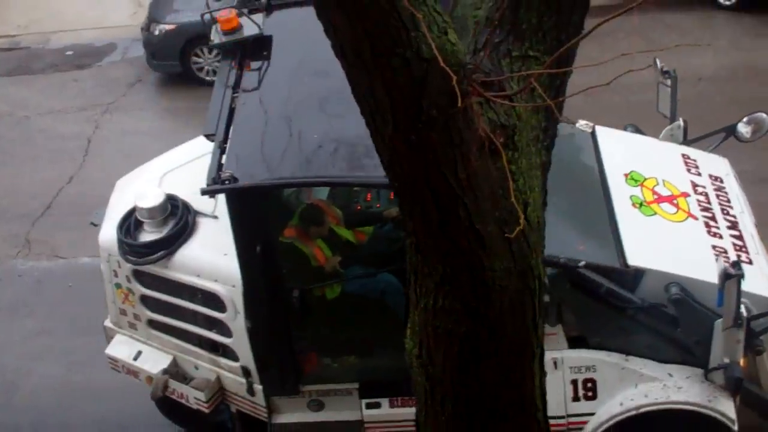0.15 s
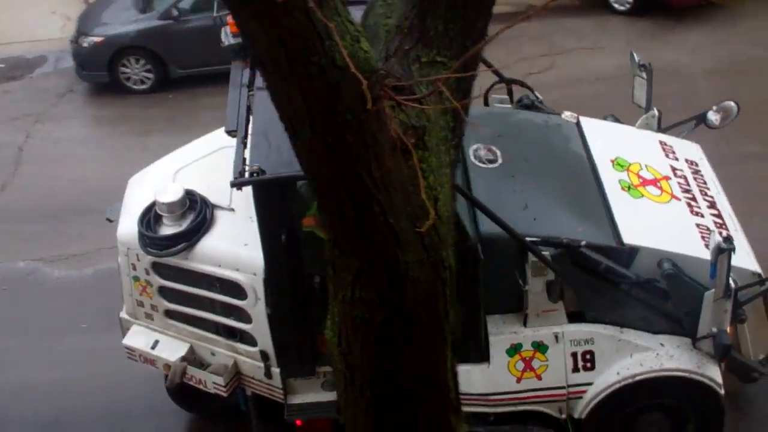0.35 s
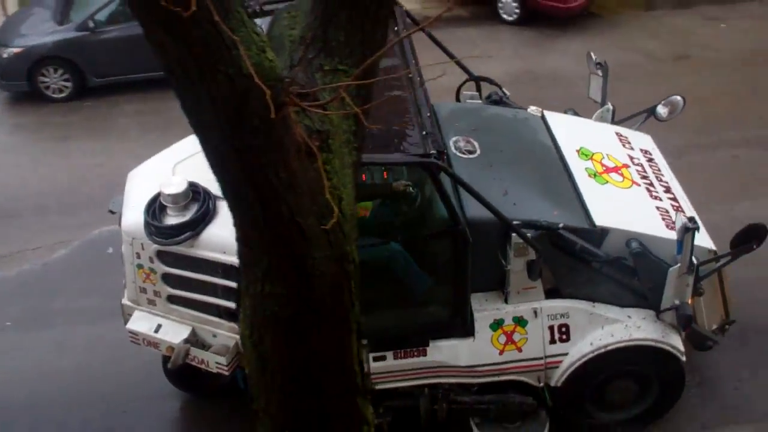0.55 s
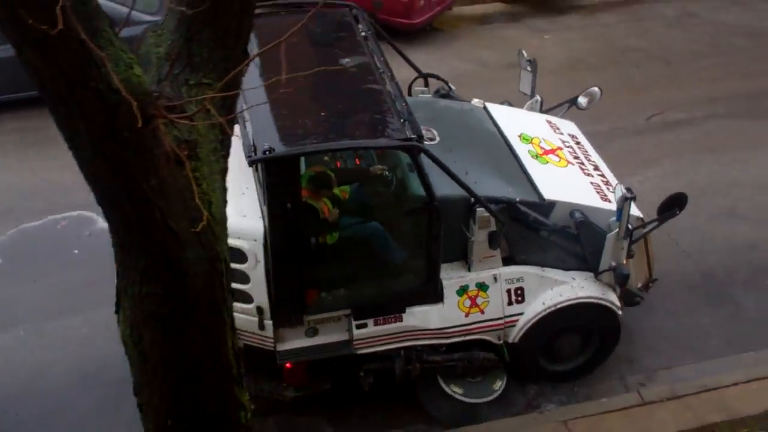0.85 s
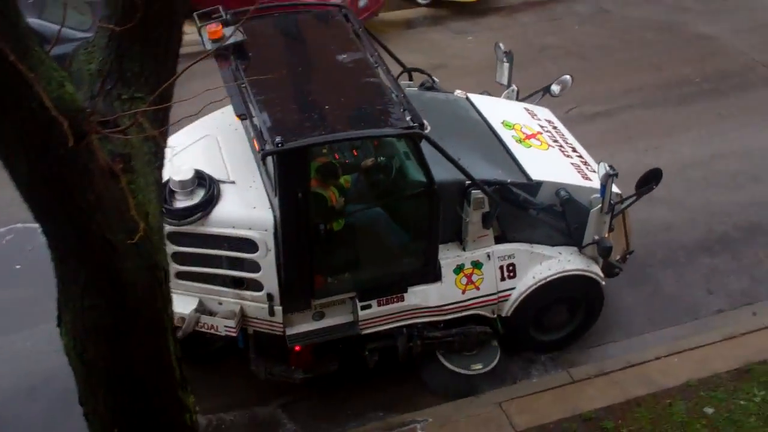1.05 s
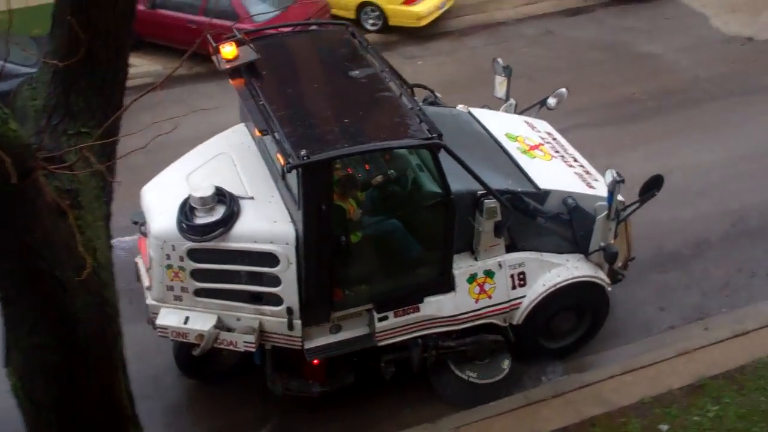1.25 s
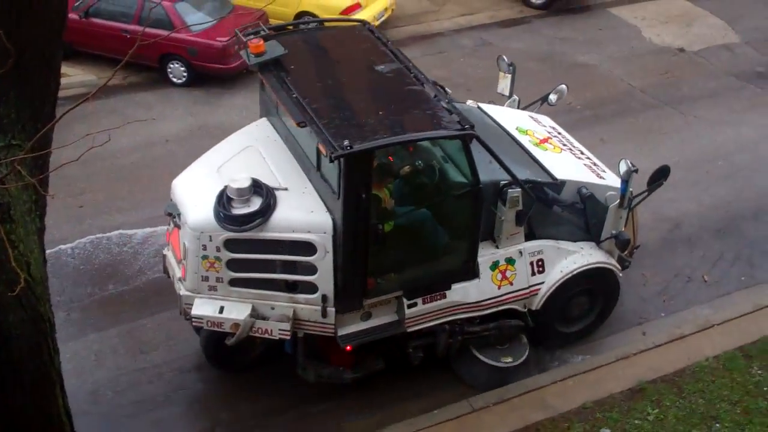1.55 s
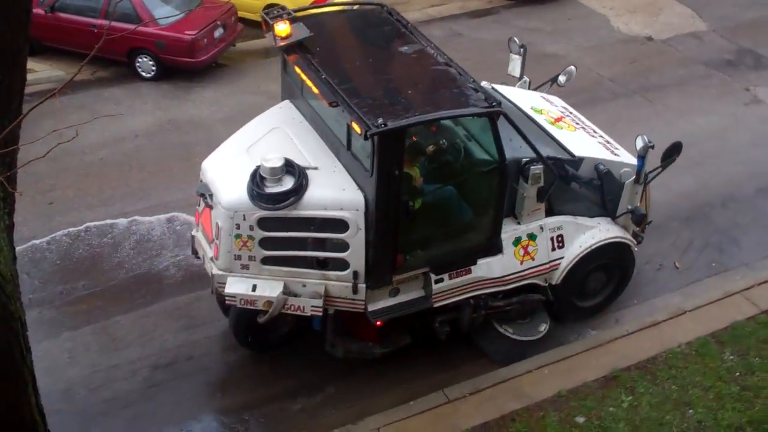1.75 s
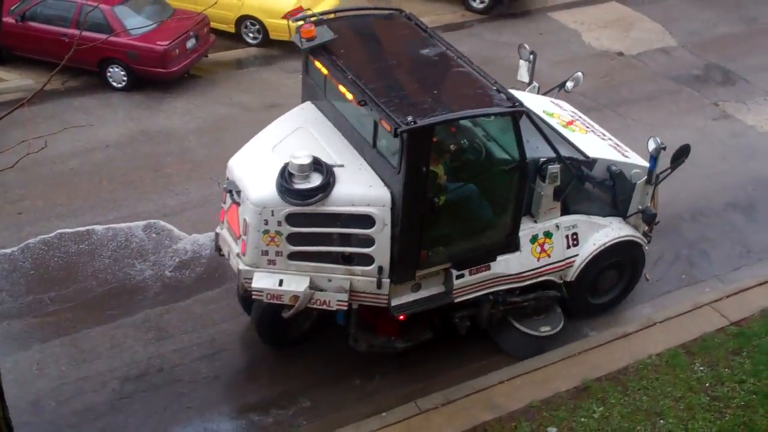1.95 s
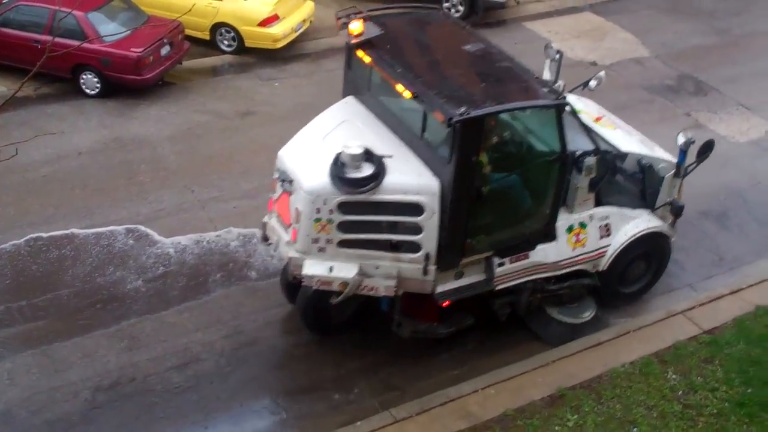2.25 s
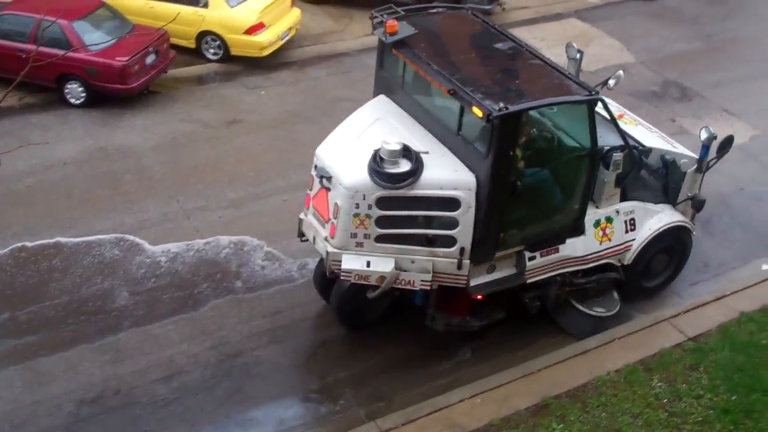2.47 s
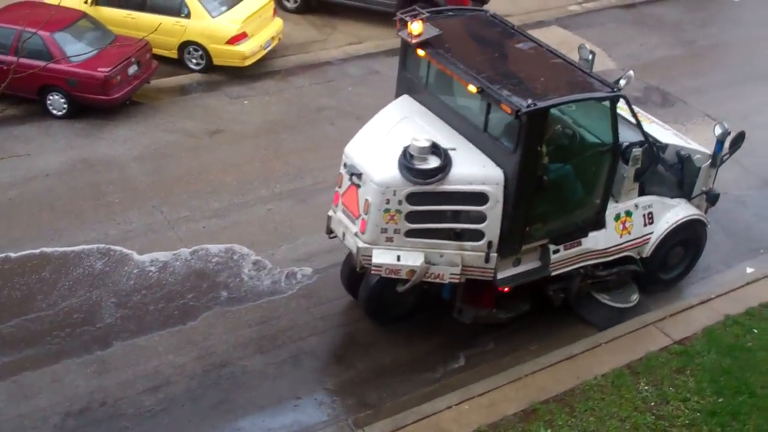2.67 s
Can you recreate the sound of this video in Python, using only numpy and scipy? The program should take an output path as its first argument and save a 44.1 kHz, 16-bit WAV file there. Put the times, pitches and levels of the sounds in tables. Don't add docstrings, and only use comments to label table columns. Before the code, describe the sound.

Continuous broad hiss of sweeper brushes and water spray, dull behind a tree then opening up, with a low diesel hum, hollow fan roar and wavering pump whines, picked up by a nearby handheld stereo microphone.

```python
import sys
import numpy as np
from scipy import signal
from scipy.io import wavfile
from scipy.ndimage import uniform_filter1d

SR = 44100
rng = np.random.default_rng(int(sys.argv[2]) if len(sys.argv) > 2 else 0)


def master_out(mix):
    frames = np.transpose(np.atleast_2d(mix))
    ceiling = np.clip(frames, -1, 1)
    pcm = np.round(ceiling * 32767).astype(np.int16)
    wavfile.write(sys.argv[1], SR, pcm)


def linear_from_db(decibels):
    return 10 ** (np.asarray(decibels, float) / 20)


N = 123921

# (time [s], level [dB])
EXPOSURE_DB = [(0, -31), (.16, -32.5), (.4, -30.5), (.7, -28), (.85, -25.5), (1.02, -25), (1.3, -25),
               (1.45, -25), (1.55, -26), (1.75, -25.5), (1.87, -26.5), (2.2, -26.5), (2.45, -25.5),
               (2.65, -27), (2.81, -26.5)]
# (frequency [Hz], share of the shading [1])
SHADE = [(500, 0.42), (1500, 0), (2300, 0.18), (3300, 0.64), (5000, 1.09), (10000, 1.13), (14000, 1.12)]
# (frequency [Hz], density [dB per Hz])
HISS_COLOUR_DB = [(1300, -11), (1680, -9), (2150, -11.5), (3000, -6), (4600, -4.5), (10500, -3.5),
                  (12500, 0), (14200, 1.5)]
OPEN_DB, HISS_DB = -24, -19.5

# (frequency [Hz], density [dB per Hz])
ROAR_COLOUR_DB = [(30, -38), (70, -20.5), (140, -12), (280, -1), (350, -4), (440, -11.5), (800, -14.5),
                  (1600, -24.5)]
# (centre [Hz], width [Hz], lift [dB])
HOUSING = [(286, 44, -1), (585, 121, 5), (1025, 135, 8.5)]
# (time [s], lift [dB])
OPENING_DB = [(0, -1), (.5, -2.5), (.85, -2.5), (1.1, 1), (1.7, 0.5), (2.81, 2)]
ROAR_DB = -33.5

# (time [s], firing rate [Hz], first order [dB], second order [dB])
ENGINE = [(0, 63.36, -52, -41.5), (.3, 64.27, -58, -45.5), (.55, 64.3, -54, -45.5), (.8, 65.16, -58, -76),
          (.95, 65.3, -64, -51), (1.15, 65.24, -68, -43), (1.45, 64.34, -65, -46),
          (1.65, 63.86, -54, -50.5), (1.9, 63.9, -59, -42.5), (2.2, 63.8, -56, -45), (2.5, 63.7, -55, -44),
          (2.81, 64, -51, -49)]
# (multiple of firing rate [1], level [dB])
ORDERS_DB = [(1.5, -71), (2.5, -63.5), (3, -55.5), (3.5, -59), (4, -54.5), (4.5, -65), (5, -52), (6, -59.5)]
# (start [s], length [s], multiple of firing rate [1], level [dB], pitch arch [share of firing rate])
PANELS = [
    (.62, .62, 5.36, -36.5, .028),
    (2.12, .36, 5.15, -39.5, .1),
    (.1, .42, 7.02, -44, 0),
    (.1, .5, 5.42, -44, 0),
    (1.45, .25, 5.55, -45, .01),
    (1.15, .3, 5.1, -43, 0),
    (0, .55, 10.5, -49, 0),
    (0, .35, 4.45, -41, 0),
    (1.35, .5, 9, -51, 0),
    (.9, .3, 4.7, -43, .02),
]
FIRING_HZ, CATCH_S = 64, .08

# (time [s], brush motor whine [dB], pump whine [dB])
LOAD_DB = [(0, -42, -43.5), (.2, -40, -47), (.45, -42.5, -46), (.8, -44.5, -49), (1.1, -40, -46.5),
           (1.3, -56, -44), (1.55, -41.5, -48), (1.7, -49, -47), (1.9, -38, -59), (2.05, -48, -51),
           (2.2, -36.5, -47), (2.35, -46, -43.5), (2.5, -38.5, -49), (2.81, -56, -66)]
# (column of LOAD_DB, width [Hz], frequency [Hz])
PUMPS = [
    (1, 6, 302),
    (2, 14, 1075),
]
SAG = 0.0058

# (frequency [Hz], likeness [1])
SAME = [(60, .8), (340, .98), (1000, .93), (2300, .72), (3600, .68), (5600, .62), (6600, .5), (14000, .47)]
# (time [s], centre [Hz], added likeness [1])
ALIKE = [(0, 4800, -.1), (.6, 5000, 0), (.9, 4800, .2), (1.4, 4800, .2), (1.7, 3900, .22),
         (2.81, 4000, .22)]
# (frequency [Hz], lead [rad])
LEAD_RAD = [(60, 0.21), (2500, -0.29), (5600, -0.69), (7150, -0.95), (8530, -1.3), (11000, -1.7),
            (14200, -2.56)]
# (time [s], share of the phase lead [1])
BEARING = [(0, 0.43), (1.3, 0.58), (2.81, 1.36)]
# (frequency [Hz], level difference [dB])
TILT_DB = [(60, -5), (300, -8.5), (1000, -6), (2400, -6), (3800, -4.5), (5600, -4), (7900, -4),
           (14200, -7.5)]
ALIKE_WIDTH_HZ = 350
CENTRED = 0.43
WANDER_DB, WANDER_RAD = 1, .5
STRIDE = 64


def evened(x):
    return x / np.sqrt(np.mean(x ** 2) + 1e-20)


def read(points, hz):
    f, value = np.transpose(points)
    return np.interp(np.log(hz + 1), np.log(f + 1), value)


def follow(points, t, axis=1):
    return np.interp(t, np.array(points)[:, 0], np.array(points)[:, axis])


def drift(t, top_hz):
    coarse = np.linspace(0, t[-1], num=600)
    slow = 0
    for f in np.geomspace(top_hz / 20, top_hz, num=20):
        slow = slow + np.sin(2 * np.pi * (f * coarse + rng.random())) / np.sqrt(f)
    return np.interp(t, coarse, evened(slow))


def noise(field_db, patchy_db, size=1024):
    hop = size // 4
    frames, hz = N // hop + 5, np.fft.rfftfreq(size, 1 / SR)
    t = np.arange(frames) * hop / SR
    a, b, c, d, patches = rng.standard_normal((frames, len(hz), 5)).T
    patches = uniform_filter1d(patches, size=14, axis=0)
    patches = evened(uniform_filter1d(patches, size=12, axis=1))

    off_band = (hz[:, None] - follow(ALIKE, t)) / ALIKE_WIDTH_HZ
    same = read(SAME, hz)[:, None] + follow(ALIKE, t, axis=2) / (1 + off_band ** 4)
    same = np.clip(same, 0, 1)
    lead = read(LEAD_RAD, hz)[:, None] * follow(BEARING, t)
    left = a + 1j * b
    right = same * left * np.exp(-1j * lead) + np.sqrt(1 - same ** 2) * (c + 1j * d)

    tilt = read(TILT_DB, hz)[:, None] / 2
    colour = linear_from_db(field_db(hz, t) + patchy_db * patches)
    z = np.array([left * linear_from_db(tilt), right * linear_from_db(-tilt)]) * colour
    port_sum = linear_from_db(2 * tilt) + linear_from_db(-2 * tilt) + 2 * same * np.cos(lead)
    z = z / port_sum ** CENTRED
    out = signal.istft(z, nperseg=size, noverlap=size - hop)[1][:, :N]
    return out / np.sqrt(np.mean(out.mean(0) ** 2))


def place(x, hz):
    t = np.arange(0, N, STRIDE) / SR
    low = 1 / (1 + (hz / 150) ** 2)
    level = linear_from_db((read(TILT_DB, hz) + low * WANDER_DB * drift(t, 4.9)) / 2)
    half = level * np.exp(.5j * low * WANDER_RAD * (1 + drift(t, 6.2)))
    pair = np.array([half, 1 / half])
    pair = pair / abs(pair.mean(0))
    return (x * np.repeat(pair, STRIDE, axis=1)[:, :N]).real


def brushes():
    def field(hz, t):
        low_cut = -14 * np.maximum(np.log2(1300 / (hz + 1)), 0)
        shade = read(SHADE, hz)[:, None] * (follow(EXPOSURE_DB, t) - OPEN_DB)
        return (read(HISS_COLOUR_DB, hz) + low_cut)[:, None] + shade + 0.39 * drift(t, 39.7)
    return linear_from_db(HISS_DB) * noise(field, patchy_db=0.72)


def roar():
    def field(hz, t):
        lift = sum(db / (1 + ((hz - f) / w) ** 4) for f, w, db in HOUSING)
        upper = 1 / (1 + ((hz - 560) / 140) ** 2)
        fall = -12 * np.maximum(np.log2((hz + 1) / 1600), 0)
        return (read(ROAR_COLOUR_DB, hz) + lift + fall)[:, None] + upper[:, None] * follow(OPENING_DB, t)
    return linear_from_db(ROAR_DB) * noise(field, patchy_db=0.87, size=2048)


def engine():
    t = np.arange(N) / SR
    turns = np.cumsum(follow(ENGINE, t) * (1 + 0.0016 * drift(t, 8.6))) / SR

    def tone(k):
        return np.sqrt(2) * np.exp(2j * np.pi * (k * turns + rng.random()))

    first = linear_from_db(follow(ENGINE, t, axis=2)) * tone(0.99)
    second = linear_from_db(follow(ENGINE, t, axis=3)) * tone(2)
    out = place(first, FIRING_HZ) + place(second, 2 * FIRING_HZ)
    for k, db in ORDERS_DB:
        out = out + place(linear_from_db(db + 2.1 * drift(t, 6)) * tone(k), FIRING_HZ * k)
    for start, length, k, db, arch in PANELS:
        swell = np.clip(np.minimum(t - start, start + length - t) / CATCH_S, 0, 1)
        progress = np.clip((t - start) / length, 0, 1)
        bend = np.cumsum(arch * FIRING_HZ * np.sin(np.pi * progress) ** .5) / SR
        note = np.sqrt(2) * np.exp(2j * np.pi * k * (turns + bend))
        out = out + place(linear_from_db(db + 1.6 * drift(t, 13)) * swell * note, FIRING_HZ * k)
    return out


def pumps():
    t = np.arange(N) / SR
    out = 0
    for column, width, hz in PUMPS:
        level = linear_from_db(follow(LOAD_DB, t, axis=column) + 0.89 * drift(t, 15))
        pitch_hz = hz * (1 - SAG * (t / t[-1] - .5)) + width / 2 * drift(t, 10)
        whine = np.sqrt(2) * np.exp(2j * np.pi * np.cumsum(pitch_hz) / SR)
        out = out + place(level * whine, hz)
    return out


def scene():
    return brushes() + roar() + engine() + pumps()


def low_pass(x):
    return signal.sosfilt(signal.butter(12, 14215, fs=SR, output="sos"), x)


def record(dry):
    return low_pass(dry)


dry = scene()
out = record(dry)
master_out(out)
```